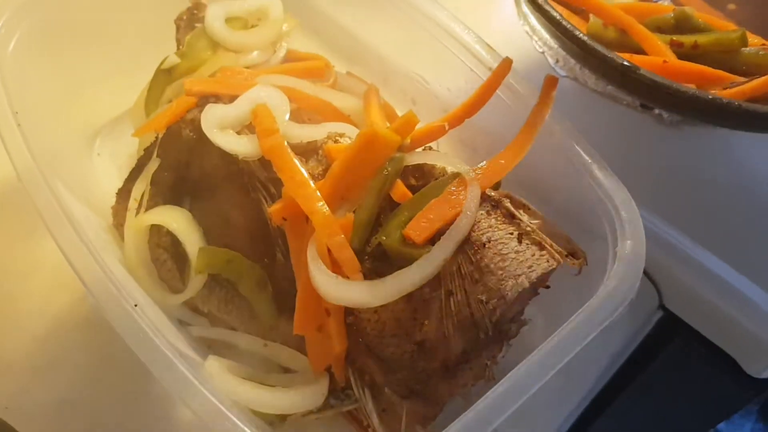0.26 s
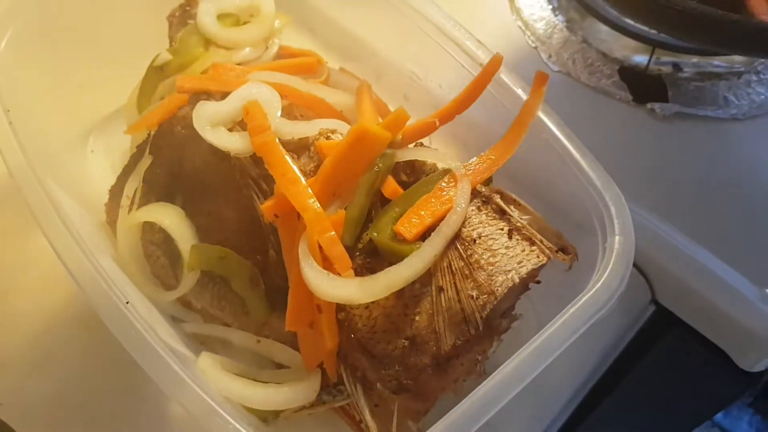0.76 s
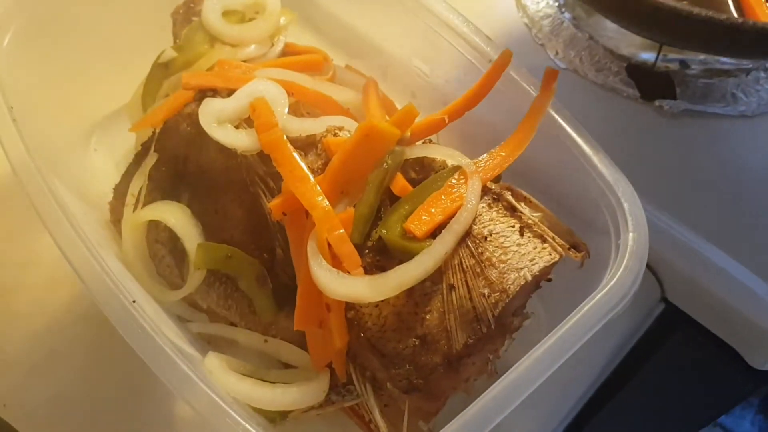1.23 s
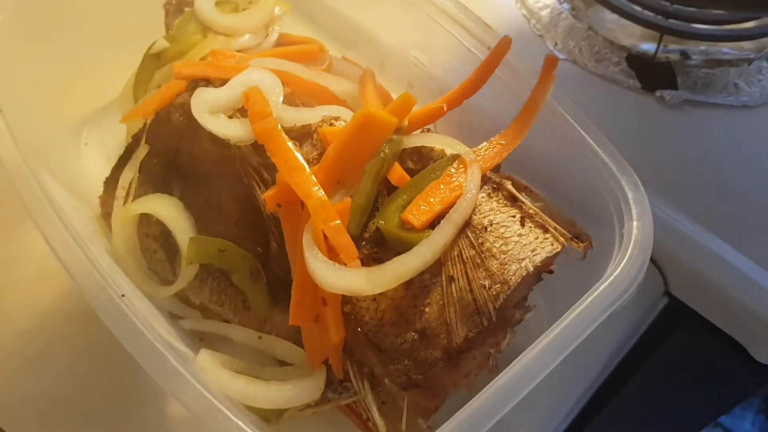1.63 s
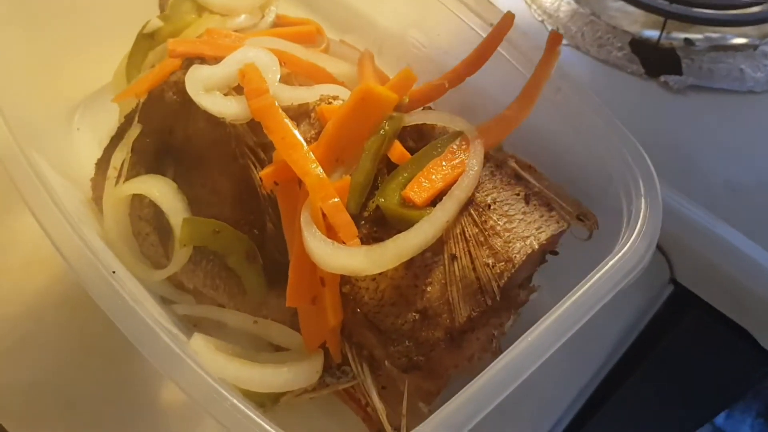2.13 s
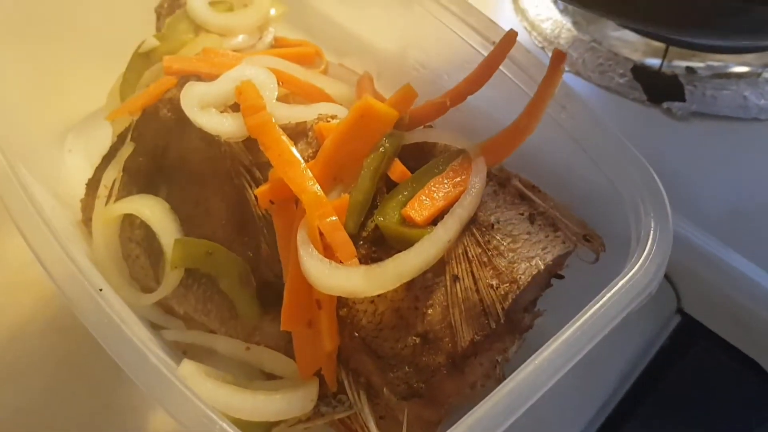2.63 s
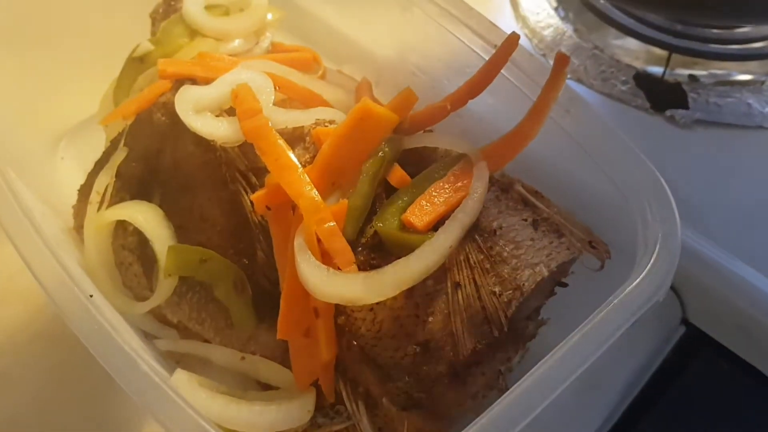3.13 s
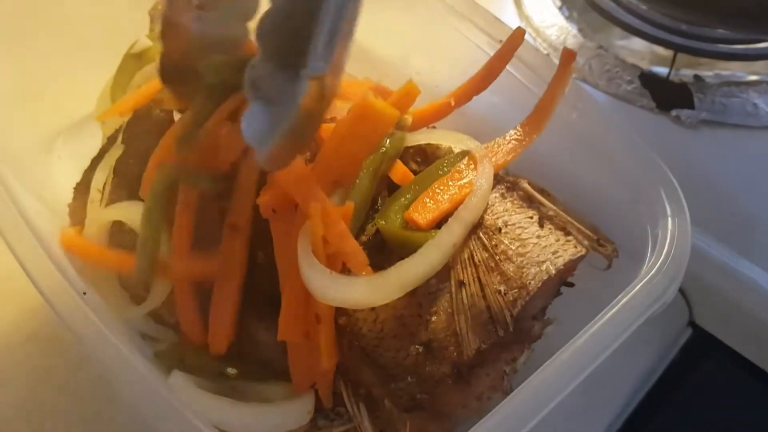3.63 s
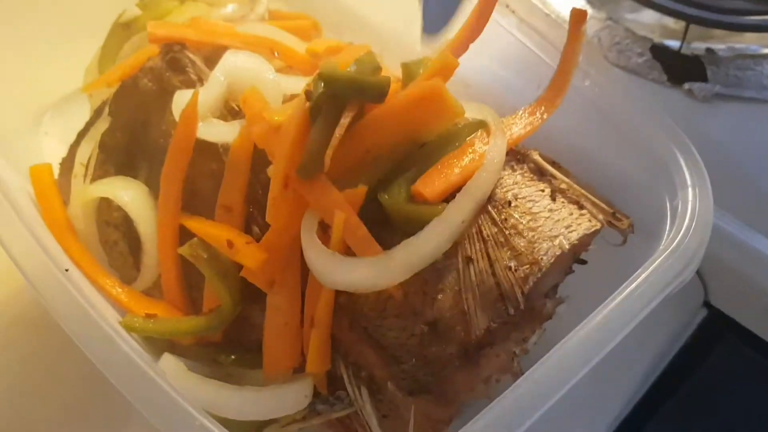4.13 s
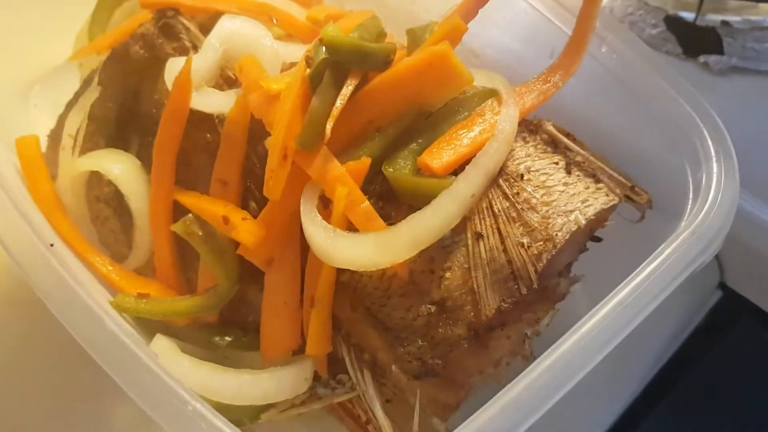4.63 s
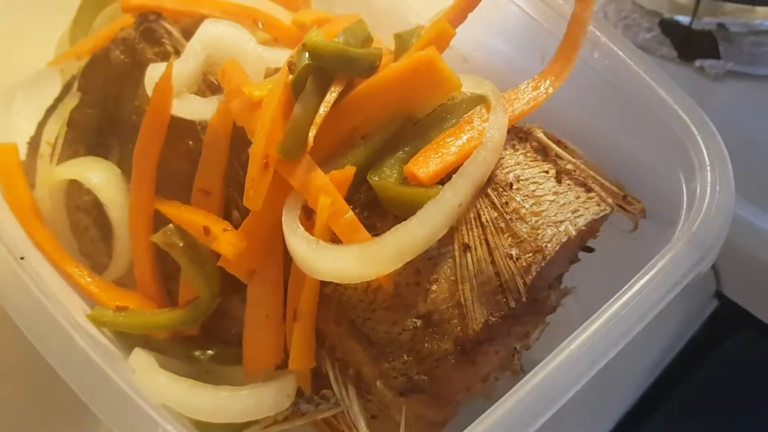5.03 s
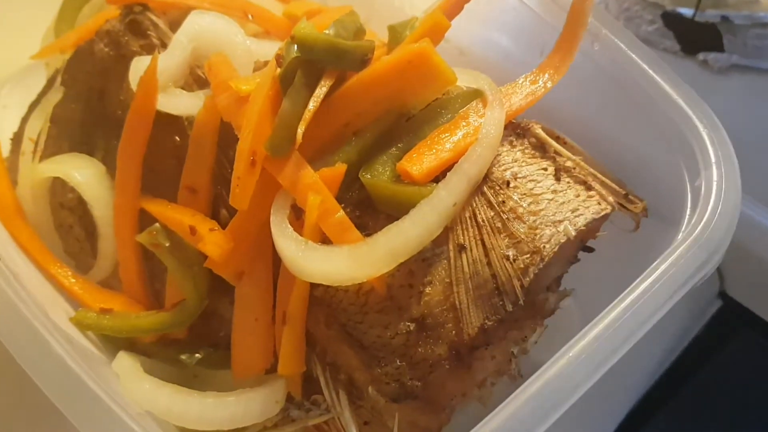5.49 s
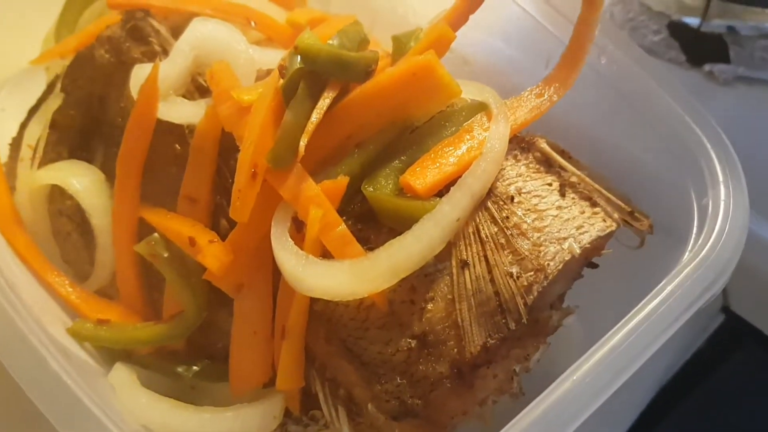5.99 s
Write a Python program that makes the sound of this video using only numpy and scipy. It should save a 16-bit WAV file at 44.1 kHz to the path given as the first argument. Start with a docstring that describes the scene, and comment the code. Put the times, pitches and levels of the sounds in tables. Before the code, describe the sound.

A soft knock on a plastic container opens over faintly bubbling sauce, a low appliance hum and small kitchen air. At about 0.6 seconds steel tongs, close and slightly to the right, tap a pan and scrape lightly. Sharper ringing clicks come at 1.1 and 1.5 seconds, each followed by a gritty scrape with tiny squeaks, the hardest near 1.3 seconds. From 1.8 to 4.4 seconds it is quieter, with soft smacks, drips and ticks as wet vegetable strips settle on fried fish. Around 3.8 seconds the bubbling, hum and air swell a little and stay there. The tongs click again at 4.6, 5.1 and 5.2 seconds, knocking the pan and making short scrapes. A last click at 5.8 seconds leads into a longer scrape that presses harder and squeaks briefly near 6 seconds, ending at about 6.3.

```python
"""A small kitchen: steel tongs gather wet vegetable strips in a pan to the right. Each grab clicks, ringing the
blades and knocking the pan, then scrapes over the pan's floor, pressing harder once on the way; sticking steel
squeaks briefly. Between grabs come soft smacks, drips and ticks of wet food. Sauce bubbles faintly and an
appliance hums over the room's air; these steady sounds swell once in the second half."""
import sys
import numpy as np
from scipy import signal
from scipy.fft import rfft, irfft, next_fast_len
from scipy.io import wavfile
from scipy.ndimage import uniform_filter1d, map_coordinates

SR = 44100
rng = np.random.default_rng(int(sys.argv[2]) if len(sys.argv) > 2 else 0)


def persist_wave(psi):
    """Save psi, clipped to +-1, as 16-bit WAV."""
    counts = np.round(np.clip(psi, -1, 1) * 32767).astype(np.int16)
    wavfile.write(sys.argv[1], SR, np.atleast_2d(counts).T)


N = 275801

# tong strikes: t/s, level/dB, t60/s, pan knock/dB, treble/dB, ring f/Hz, ring/dB
STRIKES = [(.610, -33.5, 0.11, -28, 0.5, 5700, -3), (1.120, -16, 0.11, -21, -4.5, 5000, -6),
           (1.164, -25, 0.068, 3, -4.5, 9050, -21), (1.474, -22.5, 0.046, -7.5, 0.5, 8600, -26),
           (4.639, -18.5, 0.059, -12.5, 1.5, 5240, -5.5), (5.052, -21.5, 0.077, -47, 2.5, 5020, -1),
           (5.1747, -21, 0.061, -6.5, -3.5, 5980, 3.5), (5.778, -25.5, 0.052, -9.5, -1, 5200, 0)]
# click spectrum: f/Hz, level/dB
STEEL_SPECTRUM = [(400, -22.5), (1200, -10), (2300, -6), (3800, -3), (5500, -12), (6700, -5.5), (8500, 1.5),
                  (11000, -8), (13000, -8.5), (16000, -24)]
# blade partials: f/Hz, width/Hz, level/dB
BLADE_MODES = [(2280, 86, -3), (3860, 115, 0.5), (4990, 120, 0.5), (5920, 140, 4.5), (8720, 170, -4)]
# knocked pan: f/Hz, width/Hz, level/dB
PAN_MODES = [(334, 90, -5), (642, 170, 3), (800, 83, 4.5), (1123, 146, 4.5)]


def tong_clicks(spike_db=16, crack_t60_s=0.0031, attack_s=0.00049, ring_width_hz=330, partials_db=-4,
                lead_in_s=0.003, lead_in_db=-17):
    """The tips strike: a crack, a short chatter in the blades and a knock in the pan."""
    out, t = np.zeros((2, N)), clock(SR // 4)
    for at_s, db, t60_s, knock_db, treble_db, ring_hz, ring_db in STRIKES:
        chatter = dense_modes(rng.standard_normal((2, 2 * len(t))), t60_s=0.021)[:, len(t):]
        chatter *= (decay(t, t60_s) + decay(t, crack_t60_s)) * onset(t, attack_s)
        # row 0 becomes the stereo mid: the first touch reaches both sides alike
        chatter[0] += amp(spike_db) * signal.unit_impulse(len(t), round(attack_s * SR))
        partials = amp(partials_db) * resonate(chatter, BLADE_MODES)
        steel = brightened(shaped(chatter, STEEL_SPECTRUM) + partials, treble_db)
        # the contact point picks one blade mode; the food damps it
        ring = amp(ring_db) * resonate(chatter * decay(t, t60_s=0.18), [(ring_hz, ring_width_hz, 0)])
        knock = amp(knock_db) * resonate(chatter, PAN_MODES)
        add(out, at_s, amp(db) * (steel + ring + knock))
        # a faint 3 ms hiss rises into each click
        lead_in = shaped(rng.standard_normal((2, len(t))), STEEL_SPECTRUM)
        lead_in *= (t / lead_in_s) * (t < lead_in_s)
        add(out, at_s - lead_in_s, amp(db + lead_in_db) * lead_in)
    return out


# drags: start t/s, end t/s, grit/dB, floor/dB, wall/dB, press t/s, press width/s, press/dB
STROKES = [(.612, .742, -43, -49.5, -52, .655, 0.075, 3.5),
           (1.173, 1.40, -41.5, -41, -50, 1.28, 0.042, 10.5), (1.477, 1.716, -56, -42, -58, 1.58, 0.073, 9),
           (4.658, 4.794, -44, -46.5, -50.5, 4.77, 0.07, 12), (5.246, 5.383, -41.5, -45.5, -48, 5.3, .1, 2),
           (5.803, 6.255, -54.5, -48.5, -55.5, 5.945, 0.12, 22)]
# resonances per stroke: floor f/Hz, upper floor f/Hz, upper floor/dB, wall f/Hz, rim f/Hz,
# blade f/Hz, blade/dB, treble/dB
STROKE_MODES = [(657, 1130, 1, 1860, 3700, 5100, -8.5, -0.5), (780, 1230, 0.5, 1800, 2600, 4400, -30, -1),
                (688, 1173, 2.5, 1850, 2300, 11800, -10, -2), (673, 1163, -4, 1744, 2100, 7980, -4.5, -0.5),
                (694, 967, -4.5, 1590, 2100, 6360, -9, 0.5), (762, 1220, -1, 1817, 2250, 6000, -6.5, -1)]


def pan_scrapes(floor_db=-1, wall_db=3.5, grit_db=2, rim_db=-5, partials_db=-8, floor_width_hz=70,
                wall_width_hz=110, pan_lag_s=0.033, floor_follow=0.51, sink_db_per_s=12.5):
    """Dragged tips ring the pan's wall and floor; the floor grows as they sink through the food."""
    out, slips, time = np.zeros((2, N)), friction(), clock()
    for stroke, modes in zip(STROKES, STROKE_MODES):
        start_s, end_s, steel_base_db, floor_base_db, wall_base_db, press_s, width_s, press_db = stroke
        low_hz, high_hz, high_db, wall_hz, rim_hz, blade_hz, blade_db, treble_db = modes
        during = (time > start_s - 0.06) & (time < end_s + 0.15)
        t = time[during]
        pan_press_db = press_db * press(t, press_s + pan_lag_s, width_s)
        steel_gain = amp(steel_base_db + press_db * press(t, press_s, width_s))
        wall_gain = amp(wall_base_db + pan_press_db)
        floor_gain = amp(floor_base_db + floor_follow * pan_press_db + sink_db_per_s * (t - start_s))
        # the moving tip crossfades between two sets of close modes
        travel = np.linspace(0, np.pi / 2, len(t))
        rub = sum(share * dense_modes(slips[:, during], t60_s=0.074, direct_db=-14)
                  for share in (np.cos(travel), np.sin(travel)))
        floor_modes = [(low_hz, floor_width_hz, 0), (high_hz, floor_width_hz, high_db)]
        wall_modes = [(wall_hz, wall_width_hz, 0), (rim_hz, wall_width_hz, rim_db)]
        floor = amp(floor_db) * unit(resonate(rub, floor_modes))
        wall = amp(wall_db) * unit(resonate(rub, wall_modes))
        steel = amp(grit_db) * wet_grit(rub, treble_db)
        steel += amp(blade_db) * unit(resonate(rub, [(blade_hz, 340, 0)]))
        steel += amp(partials_db) * unit(resonate(rub, BLADE_MODES))
        scrape = floor_gain * floor + wall_gain * wall + steel_gain * steel
        out[:, during] += drag(t, start_s, end_s) * scrape
    return out


# rubbing blades: f/Hz, level/dB
GRIT_SPECTRUM = [(350, -11.5), (1500, -26), (2600, 2.5), (3300, 3), (6000, -1), (6900, -7), (8500, 0.5),
                 (11000, -3.5), (13000, -11.5), (16000, -23)]


def wet_grit(rub, treble_db):
    """Wet grit under the blades sizzles brightly and unevenly."""
    return unit(brightened(shaped(patchy(rub, depth_db=2.5), GRIT_SPECTRUM), treble_db))


def friction(slips_per_s=2500, judder_db=1):
    """Tiny uneven slips over a smooth hiss, clumping as the tip judders."""
    slips = (rng.random(N) < slips_per_s / SR) * rng.standard_normal((2, N))
    hiss = rng.standard_normal((2, N))
    return unit((unit(slips) + hiss) * amp(judder_db * wobble(110)))


def drag(t, start_s, end_s, attack_s=0.014, release_t60_s=0.12):
    """The tips bite, rub on, then lift away."""
    return onset(np.maximum(t - start_s, 0), attack_s) * decay(np.maximum(t - end_s, 0), release_t60_s)


def press(t, at_s, width_s):
    """The hand bears down and eases off, 0-1."""
    return np.exp(-((t - at_s) / width_s) ** 2)


def dense_modes(x, t60_s, direct_db=-6):
    """Thin steel's many close modes add a brief random ring."""
    t = clock(SR // 10)
    ring = rng.standard_normal((2, len(t))) * decay(t, t60_s)
    ring /= np.linalg.norm(ring, axis=1, keepdims=True)
    ring[:, 0] += amp(direct_db)
    return unit(signal.fftconvolve(x, ring, axes=1)[:, :x.shape[1]])


# tongs closing in the two hardest strokes: t/s, level/dB, from f/Hz, to f/Hz, glide/s, t60/s
CLOSINGS = [(1.245, -30.5, 2810, 902, .05, 0.53), (5.89, -39, 4950, 1113, 0.085, 1.1)]


def closing_slides(width_hz=230, attack_s=0.0093, judder_db=2):
    """Juddering friction in a broad resonance that falls and fades as the tongs close."""
    out, t = np.zeros((2, N)), clock(SR // 3)
    for at_s, db, from_hz, to_hz, glide_s, t60_s in CLOSINGS:
        pitch_hz = to_hz + (from_hz - to_hz) * np.exp(-t / glide_s)
        phase = 2 * np.pi * np.cumsum(pitch_hz) / SR
        noise = rng.standard_normal((2, 2, len(t)))
        in_phase, quadrature = coloured(noise, lambda hz: 1 / (1 + (hz / width_hz) ** 2))
        band = in_phase * np.cos(phase) + quadrature * np.sin(phase)
        add(out, at_s, amp(db) * decay(t, t60_s) * onset(t, attack_s) * band)
    return out * amp(judder_db * wobble(120))


# stick-slip squeaks: t/s, f/Hz, level/dB, length/s
SQUEAKS = [(0.725, 1176, -44, 0.021), (1.292, 1830, -35.5, 0.017), (1.33, 1237, -34.5, 0.022),
           (1.505, 780, -34.5, 0.013), (1.553, 640, -33, .012), (1.714, 1130, -41.5, 0.0083),
           (4.627, 554, -35.5, 0.011), (4.754, 908, -45.5, 0.017), (5.382, 761, -42, 0.0082),
           (5.982, 1775, -21, 0.0087), (6.017, 1790, -30, 0.0073), (6.245, 805, -38, 0.022)]


def steel_squeaks(waver=0.011):
    """For a moment the slips lock onto one resonance."""
    out, t = np.zeros(N), clock()
    wavering_t = t + waver * np.cumsum(wobble(250)) / SR
    for at_s, hz, db, length_s in SQUEAKS:
        near = np.abs(t - at_s) < 3 * length_s
        envelope = np.exp(-2 * ((t[near] - at_s) / length_s) ** 2)
        out[near] += amp(db) * envelope * np.sqrt(2) * np.sin(2 * np.pi * hz * wavering_t[near])
    return out


# strips sliding and settling: t/s, level/dB, f/Hz, t60/s
SQUISHES = [(0, -48, 1990, 0.46), (0.811, -46.5, 4300, 0.17), (1.802, -41, 8000, 0.046),
            (2.131, -46.5, 1820, 0.3), (2.41, -42.5, 4660, 0.043), (2.82, -49.5, 4480, .08),
            (3.409, -51, 4000, .08), (3.936, -47.5, 1850, 0.26), (4.020, -39, 4350, 0.079),
            (4.315, -48.5, 2820, .12), (4.925, -42, 3600, 0.11), (5.426, -48, 4500, .15)]


def strip_squishes(attack_s=0.0028):
    """Wet strips part with a soft, broad smack."""
    out, t = np.zeros((2, N)), clock(SR // 4)
    for at_s, db, hz, t60_s in SQUISHES:
        smack = noise_band((2, len(t)), hz, width_hz=1.4 * hz)
        add(out, at_s, amp(db) * decay(t, t60_s) * onset(t, attack_s) * smack)
    return out


# sauce and wet pieces landing: t/s, level/dB, f/Hz
DROPS = [(.165, -41.5, 570), (.275, -34.5, 1290), (.898, -48, 696), (1.792, -36.5, 590), (1.823, -34, 1203),
         (2.445, -40.5, 636), (2.965, -40.5, 1244), (3.401, -50, 640), (3.556, -30.5, 620),
         (3.752, -35.5, 653), (3.784, -44, 710), (3.861, -35.5, 576), (3.981, -44, 1265), (4.298, -33, 538),
         (4.332, -40.5, 1270)]


def sauce_drops(note_db=-3, splash_db=-7, attack_s=0.001, t60_s=0.043):
    """Each drop lands with a dull splash around a brief bubble note."""
    out, t = np.zeros((2, N)), clock(SR // 10)
    for at_s, db, hz in DROPS:
        splash = noise_band(len(t), hz, width_hz=0.45 * hz) * decay(t, t60_s) * onset(t, attack_s)
        add(out, at_s, amp(db) * (amp(note_db) * bubble(hz, t60_s) + amp(splash_db) * splash))
    return out


def food_ticks(count=22, level_db=-54, scatter_db=2, t60_s=0.076):
    """Settling wet food ticks faintly at random."""
    out, t = np.zeros((2, N)), clock(SR // 10)
    for when, size in rng.random((count, 2)):
        tick = shaped(rng.standard_normal((2, len(t))), STEEL_SPECTRUM) * decay(t, t60_s)
        add(out, when * N / SR, amp(level_db + scatter_db * (2 * size - 1)) * tick)
    return out


def container_bump(hz=240, db=-26, t60_s=0.18, attack_s=0.00043):
    """One soft knock on the container dies away at the start."""
    t = clock()
    return amp(db) * decay(t, t60_s) * onset(t, attack_s) * np.sin(2 * np.pi * hz * t)


def simmer(count=2200, bubble_hz=625, pitch_scatter=0.15, level_db=-57, size_db=3, side_db=3.6,
           fizz_db=-71, pops_per_s=60):
    """Small bubbles ring in the sauce over a sparse fizz."""
    out = np.zeros((2, N))
    for when, (pitch, size, side) in zip(rng.random(count), rng.standard_normal((count, 3))):
        gain = amp(level_db + size_db * np.clip(size, -2, 1.5) + side_db * side * np.array([[1], [-1]]))
        hz = bubble_hz * np.exp(pitch_scatter * np.clip(pitch, -2, 2))
        add(out, when * N / SR, gain * bubble(hz, t60_s=0.046))
    pops = (rng.random(N) < pops_per_s / SR) * rng.standard_normal((2, N))
    return (out + amp(fizz_db) * shaped(unit(pops), STEEL_SPECTRUM)) * swell()


def bubble(hz, t60_s, rise_per_s=1.2, attack_s=0.00098):
    """A small bubble rings with rising pitch."""
    t = clock(SR // 10)
    return np.sin(2 * np.pi * hz * t * (1 + rise_per_s * t)) * decay(t, t60_s) * onset(t, attack_s)


# hum partials: f/Hz, level/dB
HUM_PARTIALS = [(59.3, -51), (98, -60.5), (118.7, -66), (178, -64.5), (196, -60), (237.5, -64.5),
                (296.7, -65.5)]


def appliance_hum(gain_db=0.5, waver_db=0.9, drift_rad=0.2, side_db=0.9):
    """An appliance hums a little to the left, each partial wavering."""
    t, hum = clock(), np.zeros(N)
    for hz, db in HUM_PARTIALS:
        gain = amp(db + gain_db + waver_db * wobble(7))
        drift = drift_rad * wobble(5)
        hum += gain * np.sqrt(2) * np.sin(2 * np.pi * (hz * t + rng.random()) + drift)
    return hum * amp([[side_db], [-side_db]])


# air noise: f/Hz, relative density/dB
AIR_SPECTRUM = [(25, -44), (45, -5.5), (62, -5), (130, -10.5), (200, -13), (340, -20), (600, -25.5),
                (1000, -29), (1300, -26.5), (2800, -35), (3900, -35), (4500, -33), (5200, -36), (5900, -35),
                (6900, -42), (8500, -34.5), (16000, -47)]
# stereo width of air and food: f/Hz, L-R correlation
ROOM_COHERENCE = [(60, 0.95), (180, 0.89), (550, -0.28), (1650, -0.011), (4970, -0.12), (15000, 0.2)]
# stereo lean of air and food: f/Hz, L-R/dB
ROOM_BALANCE = [(60, 1.5), (240, 2), (950, 3), (3770, -2), (15000, -9.5)]


def room_air(level_db=-51):
    """The kitchen's air: a low, slightly uneven rush."""
    noise = patchy(rng.standard_normal((2, N)), depth_db=2)
    return amp(level_db) * spread(shaped(noise, AIR_SPECTRUM), ROOM_COHERENCE, ROOM_BALANCE)


def swell(before_db=1.24, after_db=5.5, at_s=3.8, rise_s=0.49):
    """The steady sounds grow a little louder, once."""
    risen = (1 + np.tanh((clock() - at_s) / rise_s)) / 2
    return amp(before_db + (after_db - before_db) * risen)


# room decay: f/Hz, t60/s
ROOM_T60 = [(300, 0.4), (3000, 0.37), (12000, 0.11)]


def kitchen_reverb(x):
    """The room's short tail; treble dies first."""
    hz, t, spectra = signal.stft(rng.standard_normal((2, SR // 2)), SR, nperseg=256)
    tail = signal.istft(spectra * decay(t, along(ROOM_T60, hz)[:, None]), SR, nperseg=256)[1]
    return signal.fftconvolve(x, tail / np.linalg.norm(tail[0]), axes=1)[:, :N]


def amp(db):
    return 10 ** (np.asarray(db) / 20)


def unit(x):
    return x / np.sqrt(np.mean(x ** 2) + 1e-20)


def clock(samples=N):
    return np.arange(samples) / SR


def onset(t, attack_s):
    return 1 - np.exp(-t / attack_s)


def decay(t, t60_s):
    return amp(-60 * t / t60_s)


def add(track, at_s, sound):
    start = max(round(at_s * SR), 0)
    track[..., start:start + sound.shape[-1]] += sound[..., :max(N - start, 0)]


def along(points, hz):
    """Interpolate (f/Hz, value) points on a log axis."""
    knots_hz, values = np.transpose(points)
    return np.interp(np.log(hz + 1), np.log(knots_hz + 1), values)


def wobble(knots_per_s):
    """Smooth random curve."""
    return map_coordinates(rng.standard_normal(int(N * knots_per_s / SR) + 4), [clock() * knots_per_s])


def filtered(x, response):
    """Apply a complex frequency response."""
    size = x.shape[-1]
    padded = next_fast_len(size + 8192, real=True)
    return irfft(rfft(x, padded) * response(np.fft.rfftfreq(padded, 1 / SR)), padded)[..., :size]


def coloured(x, response):
    """Filter at unit power gain for white noise."""
    def levelled(hz):
        gain = response(hz)
        return gain / np.sqrt(np.mean(np.abs(gain) ** 2))
    return filtered(x, levelled)


def shaped(x, spectrum):
    return coloured(x, lambda hz: amp(along(spectrum, hz)))


def brightened(x, treble_db):
    return filtered(x, lambda hz: amp(treble_db * along([(3500, -1.1), (9000, 0.74)], hz)))


def resonate(x, modes):
    """Parallel resonances of alternating sign: f/Hz, width/Hz, level/dB."""
    def response(hz):
        return sum((-1) ** k * amp(db) * 1j * hz * width / (centre ** 2 - hz ** 2 + 1j * hz * width)
                   for k, (centre, width, db) in enumerate(modes))
    return coloured(x, response)


def noise_band(shape, hz, width_hz):
    band = [(hz, width_hz, 0)]
    return unit(resonate(resonate(rng.standard_normal(shape), band), band))


def patchy(x, depth_db):
    """Random gain in patches a few hundred Hz wide and about 20 ms long."""
    spectra = signal.stft(x, nperseg=256)[2]
    patches = uniform_filter1d(rng.standard_normal(spectra.shape[1:]), size=2, axis=0)
    patches = unit(uniform_filter1d(patches, size=7, axis=1))
    return unit(signal.istft(spectra * amp(depth_db * patches), nperseg=256)[1][:, :x.shape[1]])


def spread(pair, coherence, balance):
    """Two unrelated signals, as mid and side, become left and right."""
    def mid_side_gains(hz):
        angle = np.arccos(np.clip(along(coherence, hz), -1, 1)) / 2
        return np.array([np.cos(angle), np.sin(angle)])

    def left_right_gains(hz):
        lean = amp(np.outer([0.5, -0.5], along(balance, hz)))
        return lean / np.sqrt(np.mean(lean ** 2, axis=0))

    mid, side = filtered(pair, mid_side_gains)
    return filtered(np.array([mid + side, mid - side]), left_right_gains)


# stereo width of the pan: f/Hz, L-R correlation
PAN_COHERENCE = [(300, 1), (800, 0.32), (1500, 0.17), (3000, 0), (12000, 0.14)]
# pan to the right: f/Hz, L-R/dB
PAN_BALANCE = [(400, -1), (1300, -1), (2400, -0.5), (4400, -3.5), (8100, -9.5), (15000, -11)]


def scene(reverb_db=-14):
    """Tongs in the pan to the right, wet food in front, the room around them."""
    tongs = spread(tong_clicks() + pan_scrapes() + closing_slides(), PAN_COHERENCE, PAN_BALANCE)
    tongs += steel_squeaks()
    food = spread(strip_squishes() + food_ticks(), ROOM_COHERENCE, ROOM_BALANCE)
    near = tongs + food + sauce_drops() + simmer() + container_bump()
    reverb = amp(reverb_db) * kitchen_reverb(near)
    background = (appliance_hum() + room_air()) * swell()
    return near + reverb + background


def record(dry, cutoff_hz=16000):
    """Steep low-pass on the top treble."""
    return filtered(dry, lambda hz: 1 / (1 + (hz / cutoff_hz) ** 120))


dry = scene()
out = record(dry)
persist_wave(out)
```